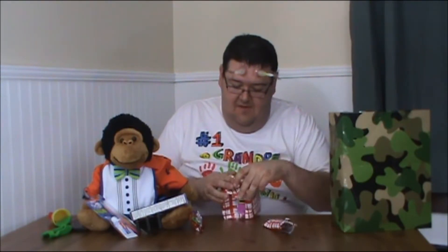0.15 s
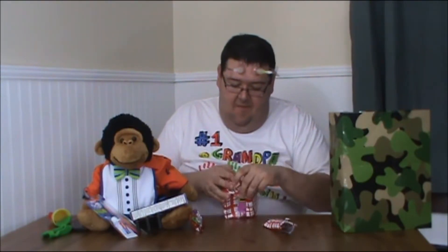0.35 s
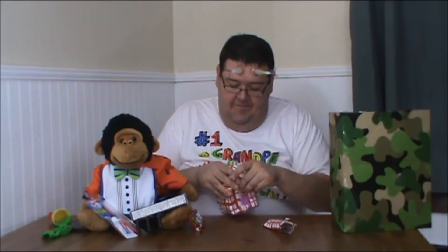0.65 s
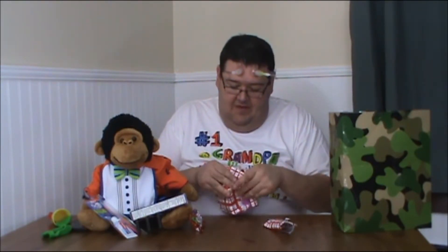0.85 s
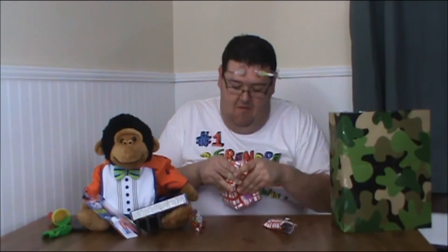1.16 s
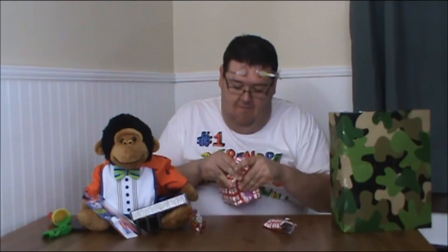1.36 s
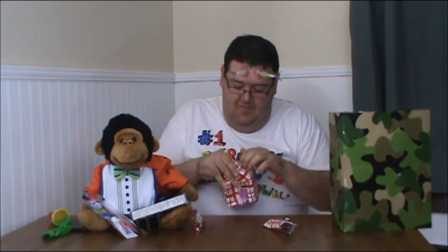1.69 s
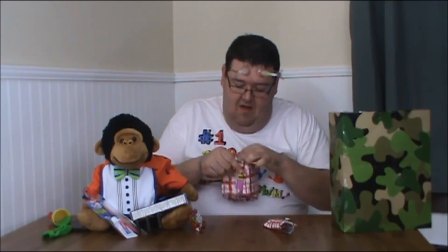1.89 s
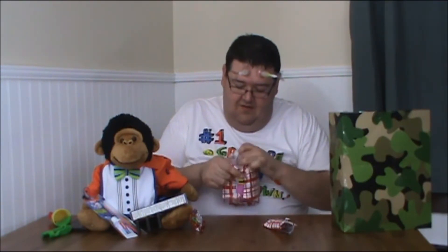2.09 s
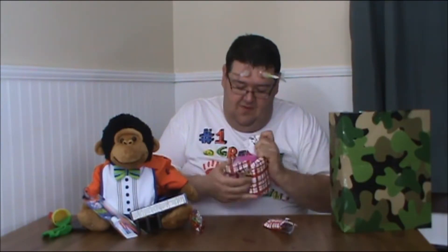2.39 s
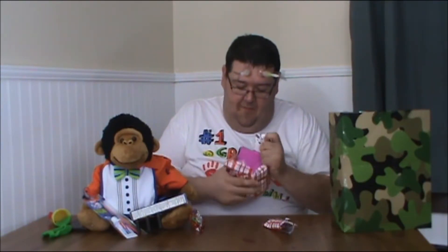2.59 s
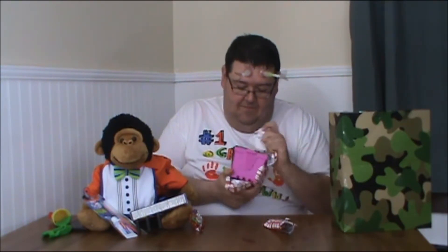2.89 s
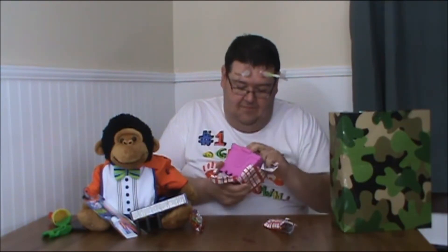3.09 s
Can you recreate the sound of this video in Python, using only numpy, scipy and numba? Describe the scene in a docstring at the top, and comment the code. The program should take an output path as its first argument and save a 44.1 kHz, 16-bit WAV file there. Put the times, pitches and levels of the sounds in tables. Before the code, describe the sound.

Crisp paper crinkling in uneven bursts, with sharp creases and dull boxy knocks, over faint hum

```python
"""Hands crumple and tear wrapping paper round a small card box on a table, a few metres from a camera.
Creases buckle as dense crackle and single snaps, filtered band by band; their low part rings the box's modes.
Folding panels add short rough rings of band-passed noise. A wall echo and diffuse noise tails form the room.
Sine hum and coloured noise lie beneath, and the camera's gain control ducks under the loud bursts."""
import sys
import numpy as np
from scipy import signal
from scipy.fft import rfft, irfft, next_fast_len
from scipy.io import wavfile
from scipy.ndimage import uniform_filter1d
from numba import njit

SR = 44100
rng = np.random.default_rng(int(sys.argv[2]) if len(sys.argv) > 2 else 0)


def wav_out(sig):
    """Save sig, one row per channel (or a flat mono array), as 16-bit PCM at SR to the path in sys.argv[1]."""
    wavfile.write(sys.argv[1], SR, np.round(np.clip(np.atleast_2d(sig).T, -1, 1) * 32767).astype(np.int16))


N = 143325
T = np.arange(N) / SR
BANDS = 160 * 2 ** np.arange(0, 6.7, 1 / 3)  # third-octave centres, Hz

# Crackle
CRACKLE_PER_S, GRAIN_S = 700, 0.00055  # bucklings per second, fade of each
SIZE_SPREAD_DB, LARGEST = 3.5, 2.67  # scale of the random sizes, cap on the size draw
PATCHY_DB, PATCHES_PER_S = 2, 29.935
SHARED = 0.6  # share of crackle power common to all bands
# Snaps
SNAP_DB, SNAP_RISE_S, SNAP_FADE_S = 12, 0.0011, 0.0025
# Box and folds
BOX_DB = 12
FOLD_RISE_S, FOLD_FADE_S, FOLD_OCTAVES = 0.0049, 0.017, 0.2
# Room
SPOTS, SHIFTS_PER_S = 5, 40  # places the creases sound from, level changes per second
WALL_S, WALL_DB = 0.0045, -6.5  # echo off the wall just behind the hands
ROOM_DB, ROOM_GAP_S = 1, 0.0024  # energy of each echo pattern, silence before it
ROOM_SIDE = 2.93  # gain of the room's side signal
# Background and gain control
AIR_DB = -39.5
GAIN_TOP_DB, GAIN_RATIO = -27, 2.0  # level where ducking begins, compression ratio
GAIN_ATTACK_S, GAIN_RELEASE_S = 0.035, 0.053
TOP_HZ = 16000


def undb(db):
    """Amplitude factor of a level in dB."""
    return np.exp(np.asarray(db) * np.log(10) / 20)


def unit(x):
    """Scale to an rms of 1."""
    return x / np.sqrt(np.mean(x ** 2))


def at(table, hz):
    """Value of a (pitch_hz, value) table, interpolated on a log frequency axis."""
    table = np.array(table)
    return np.interp(np.log(np.maximum(hz, 1)), np.log(table[:, 0]), table[:, 1])


def colour(x, db_of, phase_of=np.zeros_like):
    """Filter by dB and phase functions of frequency."""
    hz = np.fft.rfftfreq(x.shape[-1], 1 / SR)
    response = undb(db_of(hz)) * np.exp(1j * phase_of(hz))
    return irfft(rfft(x) * response, x.shape[-1])


def band(x, hz, octaves):
    """Band-pass of the given width; white noise comes out at its own level."""
    lo, hi = hz / 2 ** (octaves / 2), hz * 2 ** (octaves / 2)
    sos = signal.butter(2, [lo, hi], "band", fs=SR, output="sos")
    return signal.sosfilt(sos, x) * np.sqrt(SR / 2 / (hi - lo))


def fade(x, seconds):
    """Each impulse trails off exponentially."""
    return signal.lfilter([1], [1, -np.exp(-1 / (seconds * SR))], x)


def walk(rate):
    """Random levels held 1 / rate s and slewed; spread near 1."""
    hold = int(SR / rate)
    steps = np.repeat(rng.standard_normal(N // hold + 1), hold)
    return 1.06 * uniform_filter1d(steps, hold)[:N]


def clicks(rate, spread_db):
    """Random bucklings of unequal size, each a very short rasp of noise."""
    chance, draw = rng.random((2, N))
    size_db = spread_db * np.minimum(-np.log(1 - draw), LARGEST)
    size = (chance < rate / SR) * undb(size_db)
    return unit(fade(size, GRAIN_S) * rng.standard_normal(N))


def weights(hz):
    """Shares of the four region levels (deep boom, boom, body, treble) that reach a band."""
    # Corner pitches (Hz): deep boom, boom, body from and to, treble
    region_hz = (270, 700, 1400, 2600, 7500)
    rows = np.eye(4)[:, [0, 1, 2, 2, 3]]  # the body level holds between its two corners
    return np.array([at(list(zip(region_hz, row)), hz) for row in rows])


def crackle():
    """Dense buckling of the handled paper: clicks whose level moves separately in each band."""
    # Crackle level over time, joined by straight lines:
    # time_s, deep_boom_db, box_boom_db, paper_body_db, crisp_treble_db (relative levels)
    level_curve = np.array([(0.0, -31, -23.5, -35.5, -37), (0.089, -47, -72, -57, -44),
                            (0.23, -47, -49.5, -42, -41), (0.281, -31, -16.5, -30, -29),
                            (0.33, -51, -45, -22.5, -29.5), (0.35, -32, -21, -23, -36),
                            (0.4, -37, -38, -28, -29), (0.429, -20, -17.5, -14, -22.5),
                            (0.47, -19.5, -16.5, -12, -16.5), (0.525, -30, -32, -27, -31),
                            (0.6, -45, -42, -51, -63), (0.7, -39, -38, -35.5, -34),
                            (0.72, -47, -19.5, -26.5, -32), (0.8, -59, -78, -54, -52),
                            (0.841, -56, -27, -27, -30), (0.88, -52, -36, -27.5, -36),
                            (0.94, -38, -39, -47, -41), (0.979, -37, -35, -33, -31.5),
                            (1.1, -66, -47, -54, -52), (1.12, -35, -35, -39, -39),
                            (1.24, -44.5, -33.5, -37.5, -43), (1.33, -61, -43, -70, -47),
                            (1.36, -49, -43, -34.5, -28), (1.4, -38, -32, -25, -59),
                            (1.43, -47, -47, -38.5, -33), (1.45, -28, -32, -33.5, -34),
                            (1.472, -20.5, -15.5, -13, -13.5), (1.53, -37, -18.5, -22.5, -25.5),
                            (1.61, -32, -30, -42, -33.5), (1.66, -49, -25.5, -34, -31.5),
                            (1.8, -39, -35.5, -29, -29.5), (1.87, -41, -20.5, -18.5, -18),
                            (1.92, -37, -24.5, -18, -15), (1.99, -27, -25, -28, -24),
                            (2.019, -45, -30, -21.5, -24.5), (2.08, -46, -46, -56, -78),
                            (2.11, -69, -32.5, -32.5, -26), (2.238, -24, -7.5, -16, -14.5),
                            (2.37, -44, -51, -37, -66), (2.4, -42, -21, -33, -25.5),
                            (2.44, -40, -54, -30, -32), (2.519, -47, -39, -60, -48),
                            (2.551, -56, -27, -33.5, -38), (2.61, -32, -33.5, -31.5, -33.5),
                            (2.68, -29, -29.5, -20, -16.5), (2.76, -23.5, -15, -21.5, -13),
                            (2.81, -19, -39, -16, -17.5), (2.87, -44, -21, -22.5, -13),
                            (2.969, -37, -37.5, -36.5, -35), (3.025, -22, -18.5, -23.5, -17),
                            (3.055, -33, -15.5, -27, -32), (3.13, -44, -57, -56, -56),
                            (3.22, -54, -51, -48, -43.5), (3.25, -33, -21, -28.5, -35)])
    common = clicks(CRACKLE_PER_S, SIZE_SPREAD_DB)
    own = clicks(CRACKLE_PER_S, SIZE_SPREAD_DB)
    patches = walk(PATCHES_PER_S)
    shifts = rng.integers(0, N, len(BANDS))  # shifted copies make the bands differ
    drives = []
    for hz, shift in zip(BANDS, shifts):
        grains = np.sqrt(SHARED) * common + np.sqrt(1 - SHARED) * np.roll(own, shift)
        level_db = np.interp(T, level_curve[:, 0], level_curve[:, 1:] @ weights(hz))
        drives.append(grains * undb(level_db + PATCHY_DB * np.roll(patches, shift)))
    return drives


def snaps():
    """Single creases give way as rasps that swell and die within milliseconds, each with its own colour."""
    # Snapping creases: start_s, level_db before SNAP_DB, then boom_db, body_db, treble_db relative to it
    creases = np.array([(0.198, -15, -21, -14, -8), (0.2377, -16, -44, -8.5, -3.5),
                        (0.267, -11.5, -26, -8.5, -6), (0.347, -5.5, -10.5, -10.5, -10),
                        (0.415, -12, -8.5, -35, 0.5), (0.6155, -18, -24, -2, -7),
                        (0.696, -31, -27, -21, -4), (0.824, -15, -11.5, 0, -15),
                        (0.840, -11.5, -26, -20, -3), (0.9667, -13, -8, -14, -11.5),
                        (1.1176, -12, -35, -17.5, -11.5), (1.2223, -17.5, -15.5, -7, -16.5),
                        (1.3484, -15.5, -14.5, -14.5, -9.5), (1.3852, -14, -29, -19, -4.5),
                        (1.4471, -4.5, -11, -12, -7), (1.6466, -11, -4.5, -11.5, -12.5),
                        (1.7507, -18.5, -24, -16.5, 4), (1.8553, -10, -39, -13, -22),
                        (2.0962, -5, -26, -12.5, -6.5), (2.108, -15, -18, -12, -9),
                        (2.1299, -7, -11, -8.5, -19), (2.189, -1, -19, -21, -10),
                        (2.316, -8, -32, -10.5, -4.5), (2.386, -3, -13, -16.5, -9.5),
                        (2.4312, -9, -39, -8.5, -9), (3.0112, -9.5, -9, -6.5, -2)])
    burst = clicks(9200, 6.0)
    drives = []
    for hz in BANDS:
        colour_db = creases[:, [2, 2, 3, 4]] @ weights(hz)  # both boom regions share one level
        hits = np.zeros(N)
        hits[(creases[:, 0] * SR).astype(int)] = undb(SNAP_DB + creases[:, 1] + colour_db)
        drives.append((fade(hits, SNAP_FADE_S) - fade(hits, SNAP_RISE_S)) * burst)
    return drives


def paper():
    """Crackle and snaps ring band by band through the paper; the low part also drives the box."""
    # Colour of the paper's clicks: pitch_hz, level_db
    click_colour = [(160, -29.5), (300, -23), (400, -12.5), (630, -7.5), (900, -14), (1300, -14),
                    (2000, -10.5), (3500, -10.5), (9000, -10), (12500, -16), (16000, -23.5)]
    sheet, low = np.zeros(N), np.zeros(N)
    for k, (hz, grains, hits) in enumerate(zip(BANDS, crackle(), snaps())):
        sign = (-1) ** k  # alternate signs let neighbouring bands join smoothly
        rung = sign * undb(at(click_colour, hz)) * band(grains + hits, hz, 1 / 3)
        sheet += rung
        if hz < 1100:
            low += rung
    return sheet + box(low)


def mode(x, hz, t60):
    """One decaying resonance, a complex one-pole filter."""
    pole = np.exp(2j * np.pi * hz / SR - np.log(1000) / (t60 * SR))
    return signal.lfilter([1 - abs(pole)], [1, -pole], x).imag


def box(push):
    """The hollow card box booms in a few modes as the paper shakes it."""
    # Box modes: pitch_hz, level_db before BOX_DB, t60_s
    box_modes = [(359, -8, 0.057), (403, -6, 0.037), (500, -28, 0.27), (590.7, -1.5, 0.083),
                 (665.3, -6.5, 0.17), (854, -9, 0.14), (1068, -6.5, 0.039)]
    return undb(BOX_DB) * sum(undb(db) * mode(push, hz, t60) for hz, db, t60 in box_modes)


def folds():
    """Each taut panel of paper or card gives a short rough ring round its pitch as it folds."""
    # Folding panels: start_s, level_db, pitch_hz
    panels = [(.352, -16, 592), (.445, -12, 2890), (.616, -27.5, 3600), (.83, -18.5, 1580),
              (.858, -20.5, 1970), (.964, -23, 792), (1.347, -25, 6200), (1.895, -13.5, 1930),
              (2.012, -15.5, 570), (2.27, -16, 986), (2.392, -16.5, 673), (2.552, -17.5, 779),
              (3.018, -15.5, 846)]
    t, out = T[:SR // 4], np.zeros(N + SR)
    shape = (1 - np.exp(-t / FOLD_RISE_S)) * np.exp(-t / FOLD_FADE_S)
    for start_s, level_db, pitch_hz in panels:
        noise = rng.standard_normal(len(t))
        out[int(start_s * SR):][:len(t)] += undb(level_db) * band(shape * noise, pitch_hz, FOLD_OCTAVES)
    return out[:N]


def tails(count):
    """Diffuse echo patterns: noise bands that each die away at their own rate."""
    # Room decay: pitch_hz, t60_s
    decay = [(300, .4), (800, 0.3), (2000, 0.36), (6000, 0.34), (14000, 0.24)]
    t = np.arange(int(0.5 * SR)) / SR
    noise = rng.standard_normal((count, len(t)))
    y = 0
    for k, hz in enumerate(BANDS[1::2]):
        t60 = at(decay, hz)
        y = y + (-1) ** k * band(noise, hz, 2 / 3) * np.sqrt(hz / t60) * undb(-60 * t / t60)
    y = y * (t > ROOM_GAP_S)
    return y / np.sqrt(np.sum(y ** 2, axis=1, keepdims=True)) * undb(ROOM_DB)


def stereo(mid, side):
    """Left and right from mid and a side signal, with level and phase offsets by frequency."""
    # Filter on the side signal: pitch_hz, level_db
    width = [(60, -12), (150, -13), (600, -21.5), (2000, -16.5), (5000, -20.5), (9000, -20.5),
             (14000, -14.5)]
    # Left over right: pitch_hz, level_db
    left_db = [(100, 0.5), (600, 1.4), (2000, 0.2), (14000, 0.1)]
    # Phase by which left leads right: pitch_hz, lead_radians
    left_lead = [(70, 0), (260, -0.74), (690, -0.8), (2000, 0.017), (5000, -0.034)]
    side = colour(side, lambda hz: at(width, hz))
    return np.array([colour(mid + sign * side,
                            lambda hz: sign * at(left_db, hz) / 2,
                            lambda hz: sign * at(left_lead, hz) / 2) for sign in (1, -1)])


def room(x):
    """Direct sound plus echoes; creases sound from shifting spots, each with its own echo pattern."""
    share = undb(20 * np.array([walk(SHIFTS_PER_S) for _ in range(SPOTS)]))
    share = share / np.sqrt(np.sum(share ** 2, axis=0))  # total power stays put
    size = next_fast_len(N + SR)
    spots = rfft(x * share, size)
    mid, side = (irfft(np.sum(spots * rfft(tails(SPOTS), size), axis=0), size)[:N] for _ in range(2))
    wall = undb(WALL_DB) * np.interp(T - WALL_S, T, x)
    return stereo(x + wall + mid, ROOM_SIDE * side)


def background():
    """Mains hum as steady sines over soft coloured room noise."""
    # Hum partials: pitch_hz, level_db (rms)
    partials = [(59, -45.5), (117.5, -52.5)]
    # Colour of the room noise: pitch_hz, relative level_db
    air_colour = [(25, 0), (60, 6), (100, 2.5), (240, 5.5), (570, 3), (1200, -2.5), (4000, -3.5),
                  (14000, -53)]
    mid, side = (colour(rng.standard_normal(N), lambda hz: at(air_colour, hz)) for _ in range(2))
    hum = sum(np.sqrt(2) * undb(db) * np.sin(2 * np.pi * hz * T) for hz, db in partials)
    return stereo(undb(AIR_DB) * unit(mid) + hum, undb(AIR_DB) * unit(side))


def scene():
    """Paper, box and folding panels in the room, over the background."""
    return room(paper() + folds()) + background()


@njit
def follow(x, attack, release):
    """Envelope that rises fast and falls slower."""
    e, out = 0., np.empty(len(x))
    for i in range(len(x)):
        e += (x[i] - e) * (attack if x[i] > e else release)
        out[i] = e
    return out


def record(dry):
    """Gain control pulls loud moments down; the top is cut steeply."""
    env = follow(np.abs(dry).mean(axis=0), 1 / (GAIN_ATTACK_S * SR), 1 / (GAIN_RELEASE_S * SR))
    gain = np.minimum(1, (undb(GAIN_TOP_DB) / (env + 1e-9)) ** (1 - 1 / GAIN_RATIO))
    top_cut = signal.ellip(12, 0.2, 90, TOP_HZ, fs=SR, output="sos")
    return signal.sosfilt(top_cut, dry * gain)


dry = scene()
out = record(dry)
wav_out(out)
```